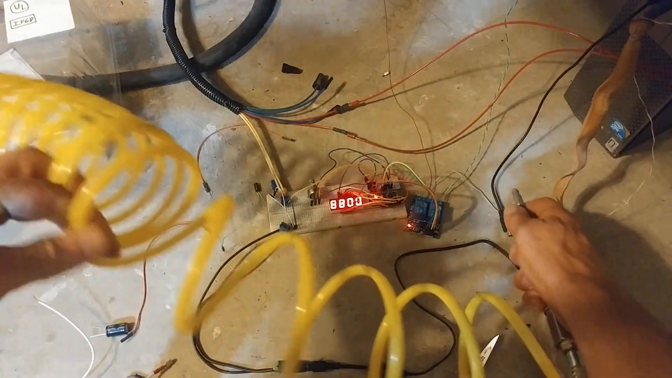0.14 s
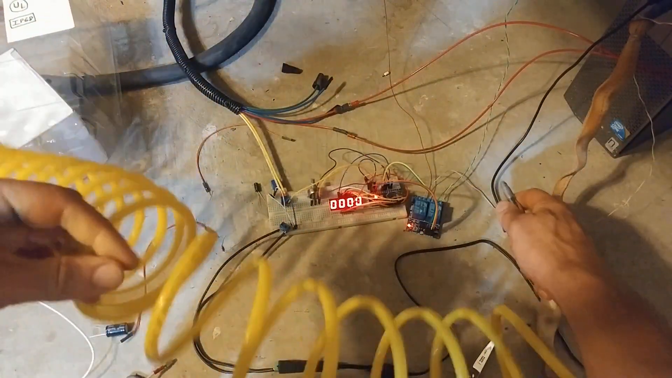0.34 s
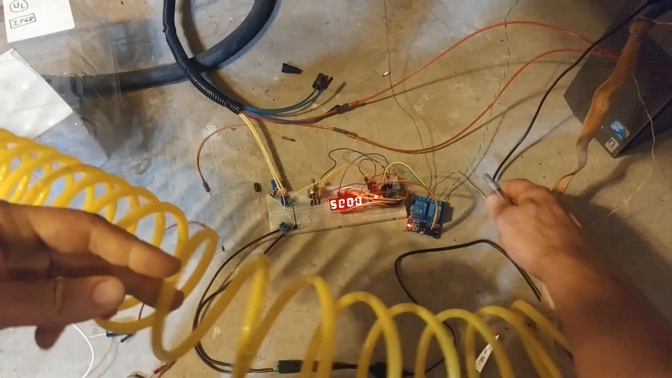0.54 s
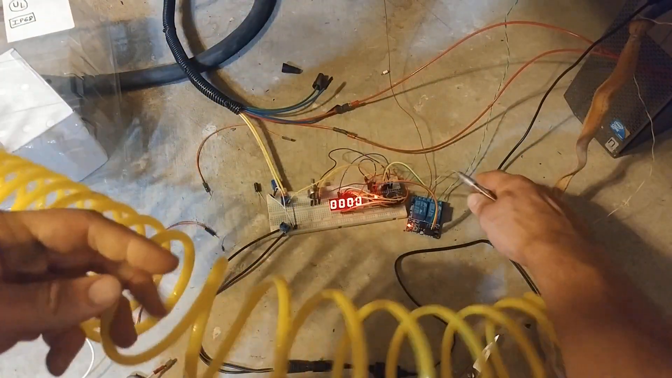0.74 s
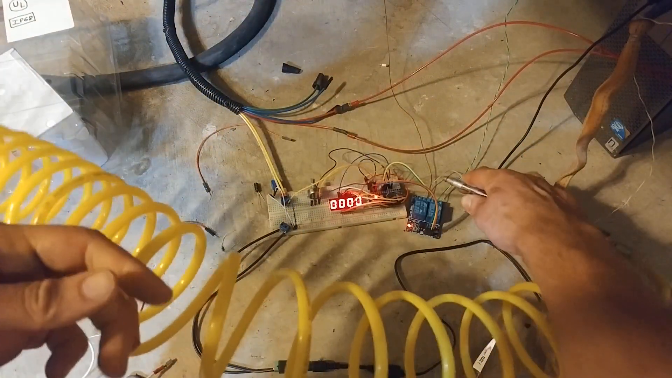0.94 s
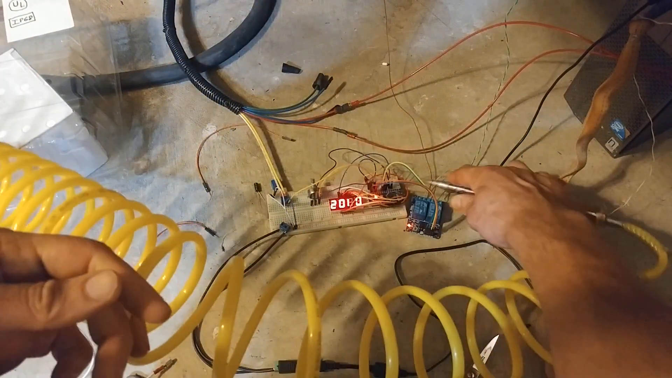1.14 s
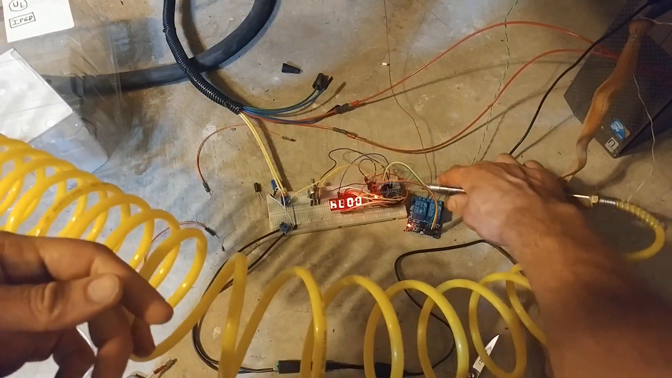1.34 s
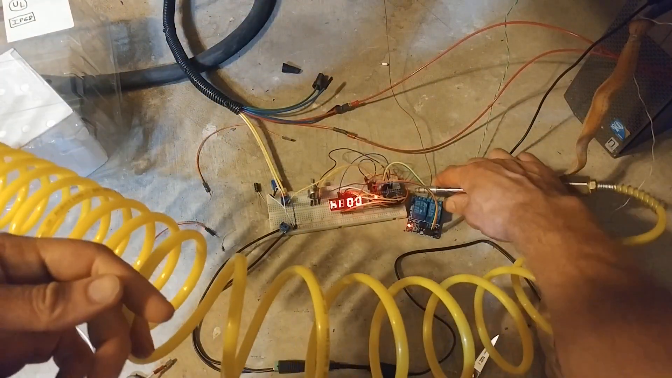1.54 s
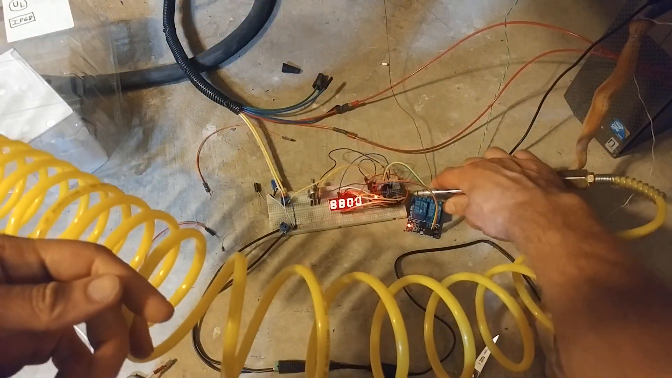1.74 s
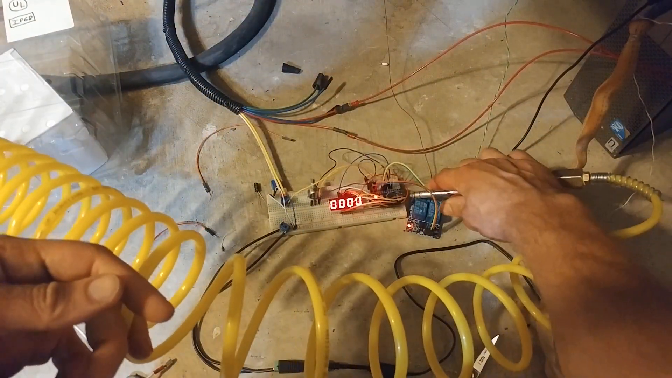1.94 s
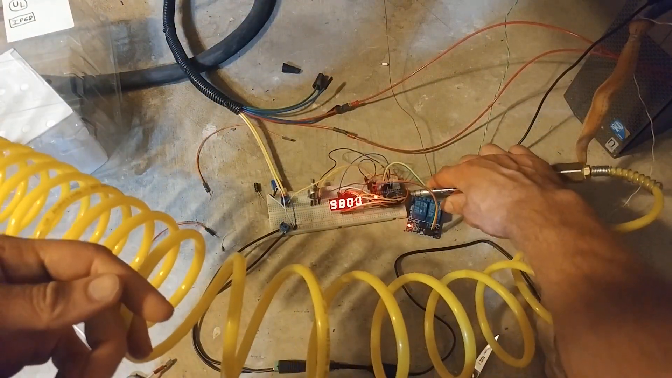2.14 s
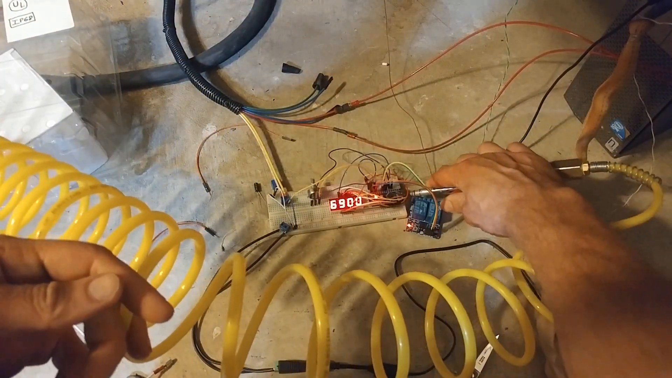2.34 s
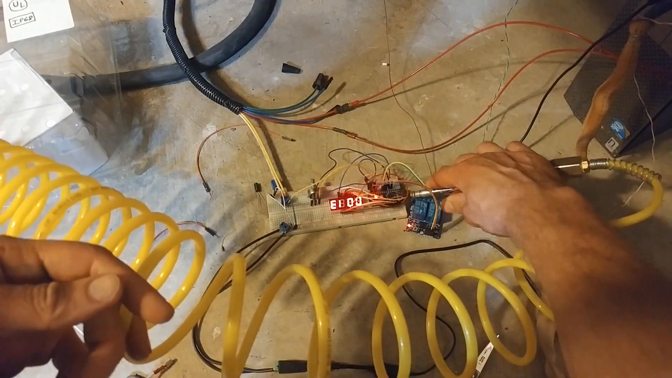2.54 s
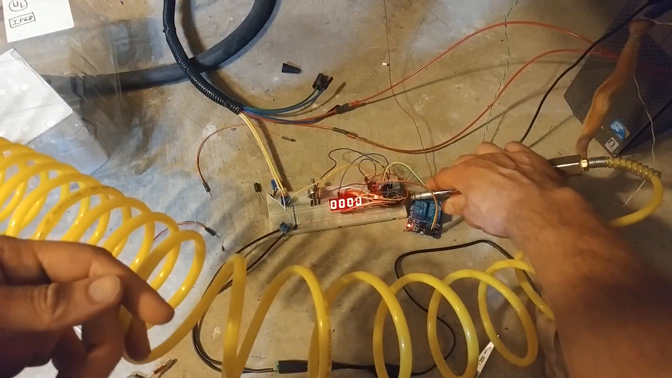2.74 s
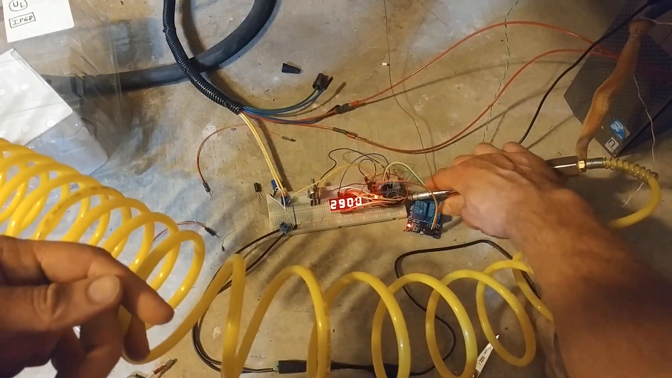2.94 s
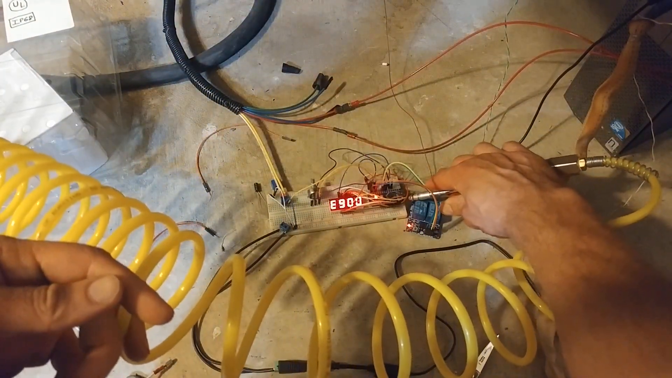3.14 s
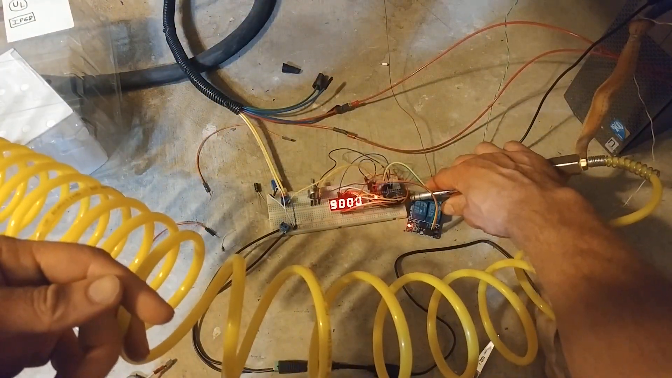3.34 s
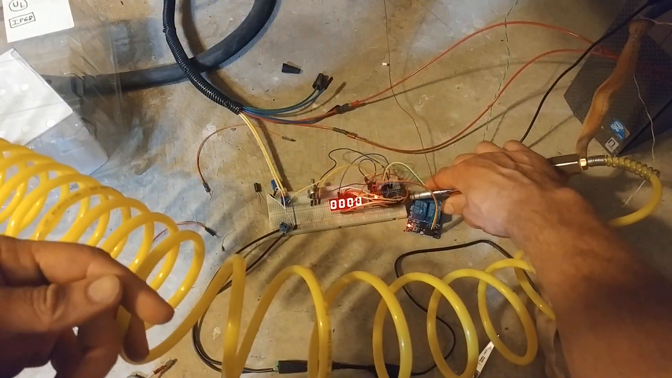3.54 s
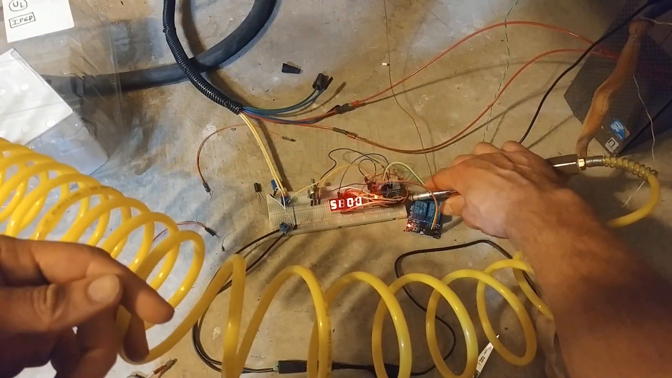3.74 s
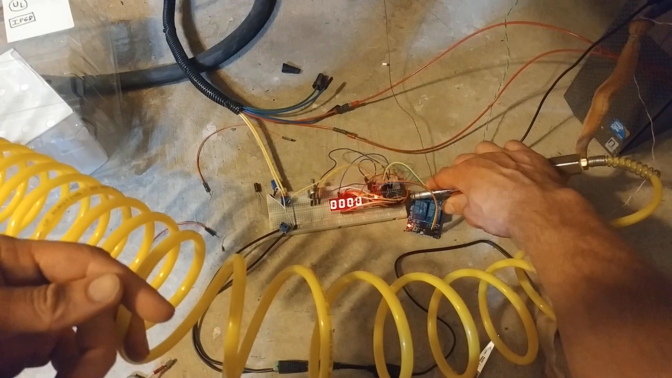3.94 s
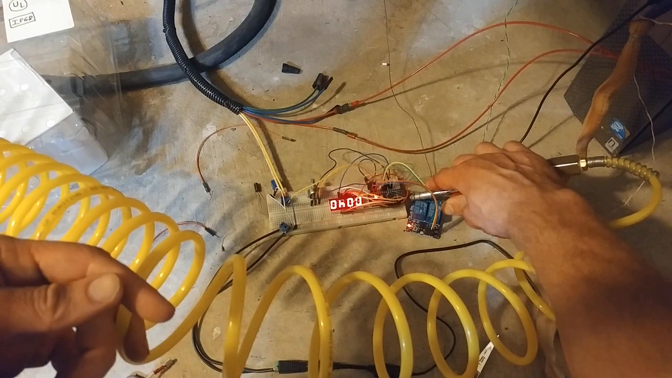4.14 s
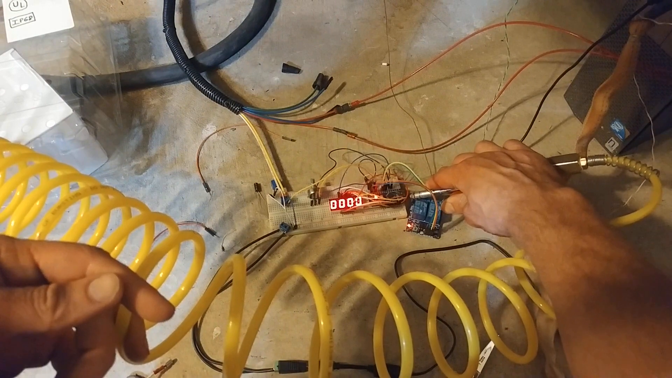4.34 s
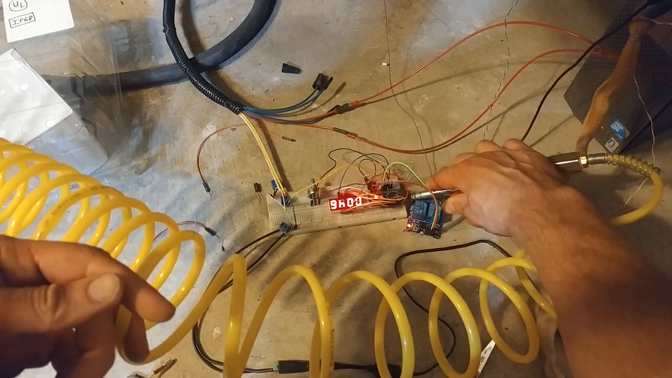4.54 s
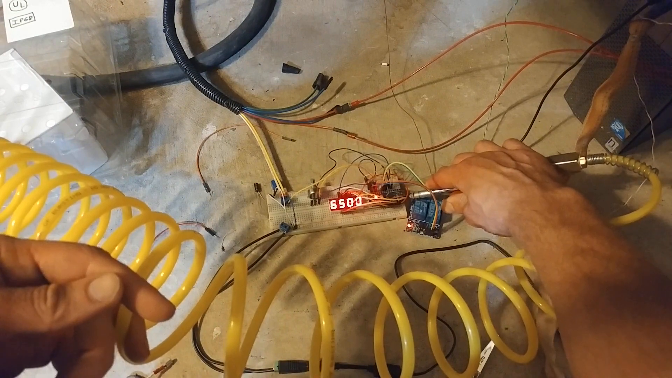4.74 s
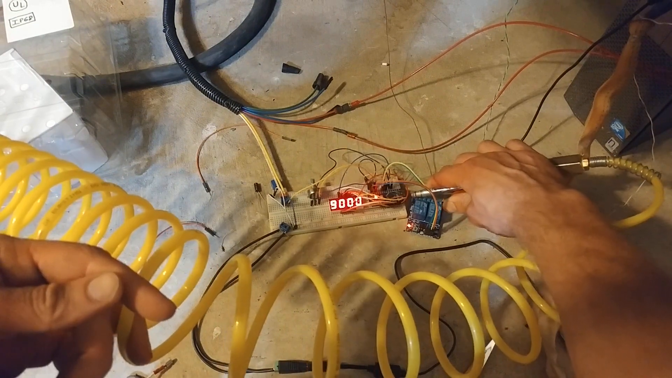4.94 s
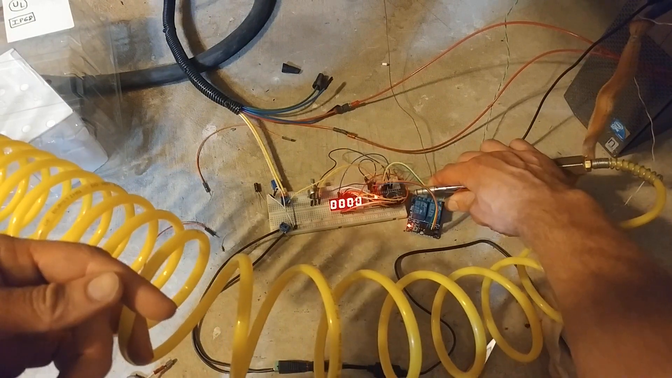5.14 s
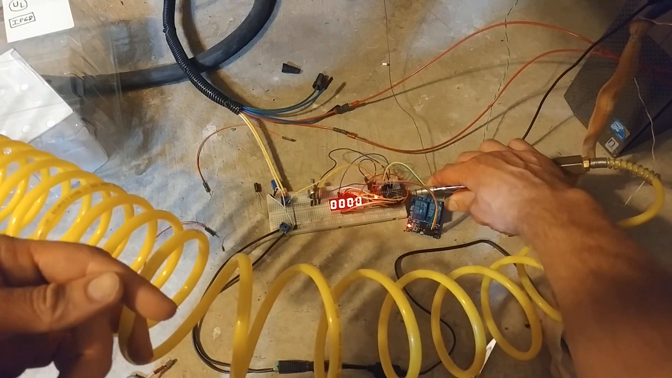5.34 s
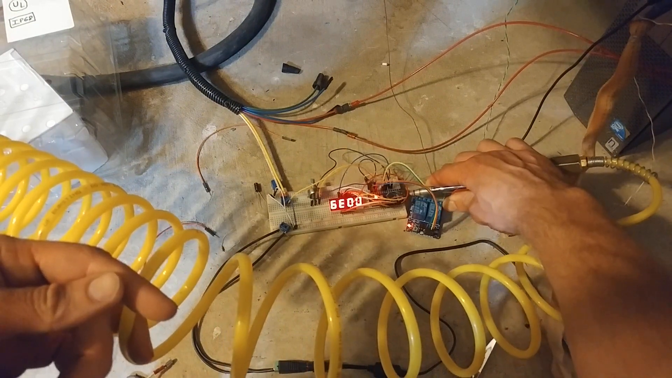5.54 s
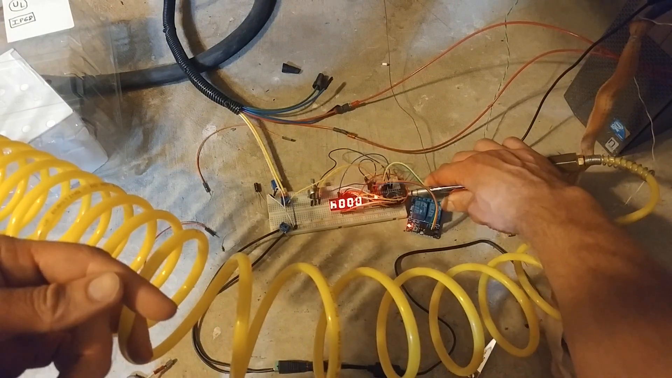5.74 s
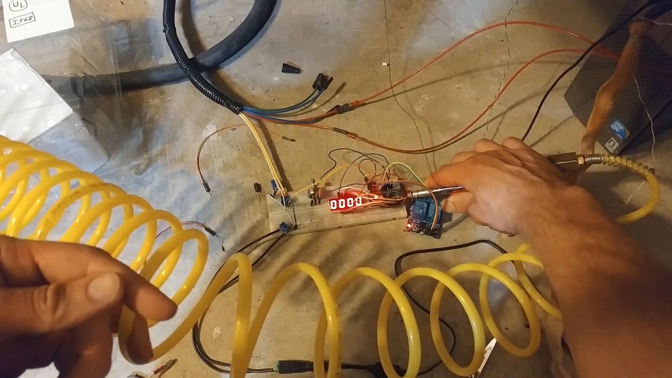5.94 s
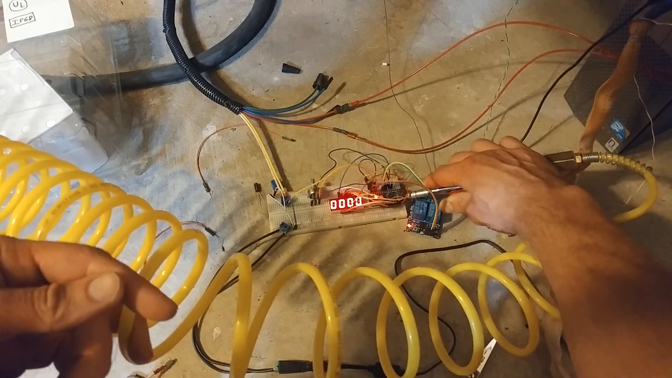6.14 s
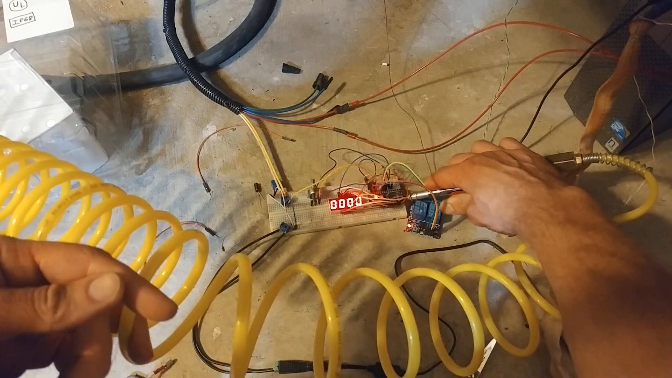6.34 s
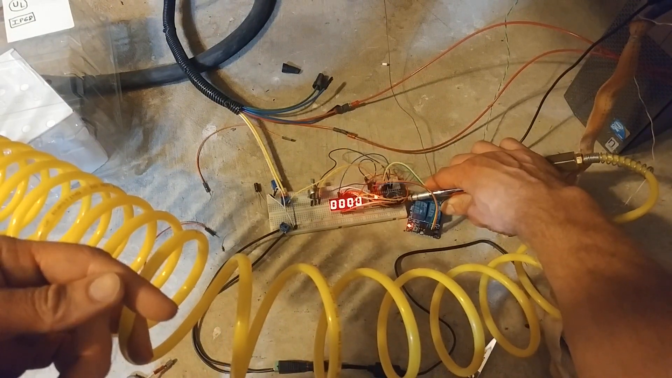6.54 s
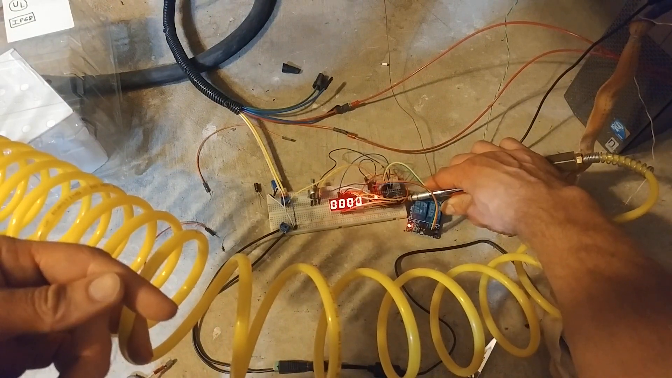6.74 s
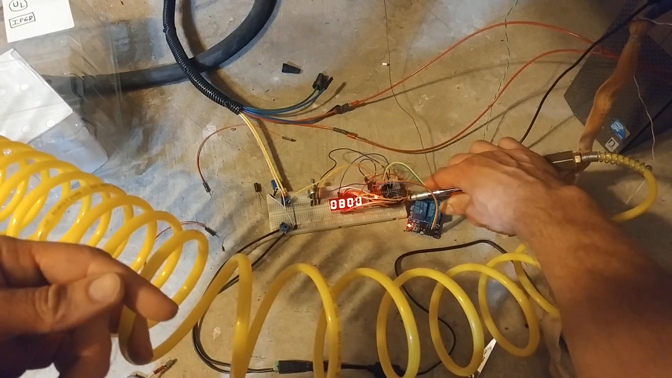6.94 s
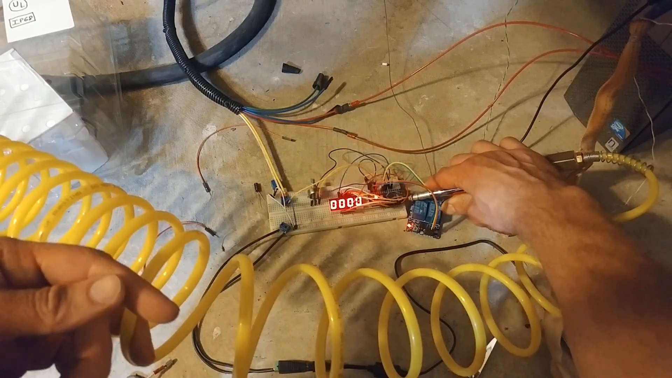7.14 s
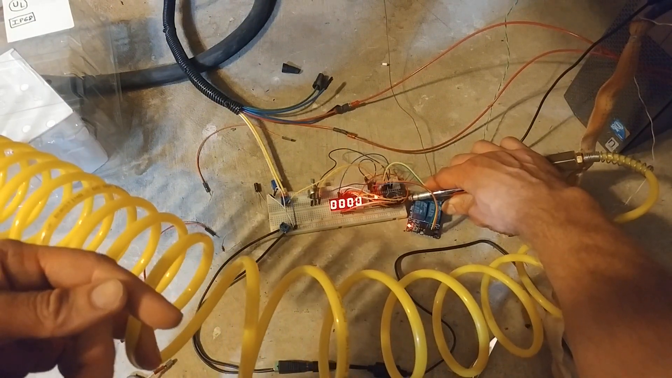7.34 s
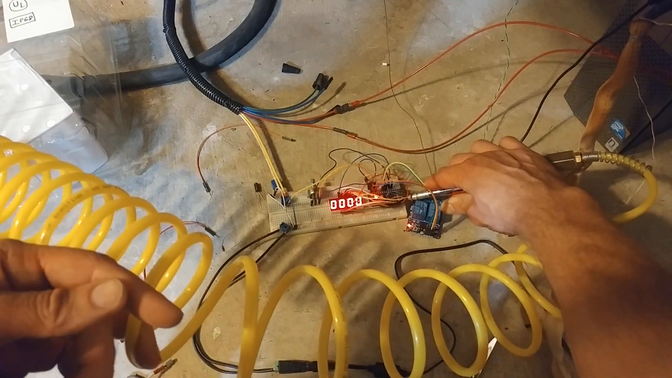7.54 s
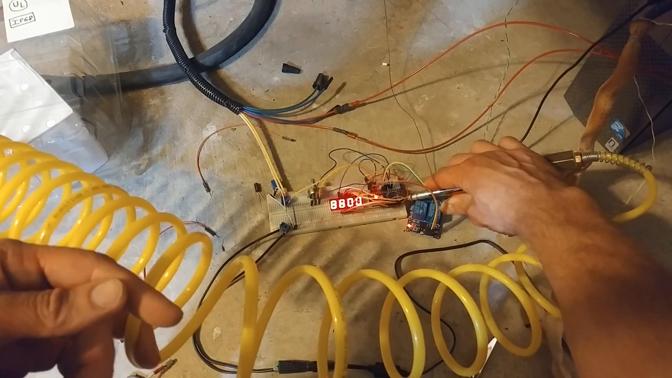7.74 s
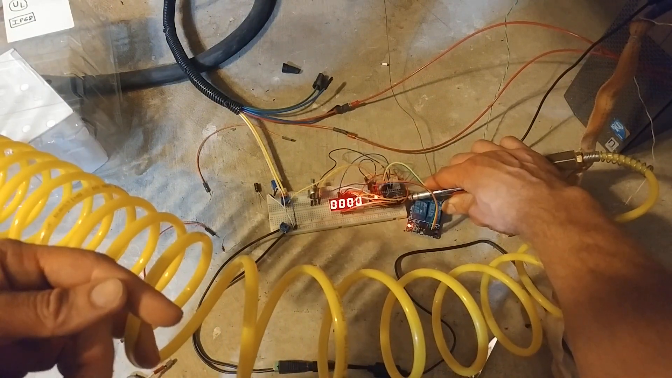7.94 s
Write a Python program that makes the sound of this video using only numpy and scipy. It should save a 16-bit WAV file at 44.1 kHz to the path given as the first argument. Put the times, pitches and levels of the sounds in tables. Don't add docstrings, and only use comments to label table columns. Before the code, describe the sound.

Faint low workshop rumble and a very weak distant motor hum open the scene. At about 0.1 s a small metal valve ticks twice and a burst of free air leaps out, strongest until about 0.25 s, then fading quickly by 0.5 s. Hollow bench knocks and hard plastic raps from the springing coiled hose cluster at 0.13-0.26 s, with another knock near 0.53 s and light coil taps until about 1.3 s over a thin, faintly whistling trickle. From 1.3 s the air swells, reaching full force around 1.6-2 s: a bright, dense hiss splashing on a circuit board, with a breathy edge tone most noticeable near 1.7 s. It dips around 2.3 s, surges at 2.7 s, then holds, gently wavering with brief brushing swells, a sharper one at 6.4 s, and a stronger push near 6.9 s. It is still hissing at 8 s. Close, centred microphone.

```python
import sys
import numpy as np
from scipy import signal
from scipy.fft import rfft, irfft, next_fast_len
from scipy.io import wavfile

SR = 44100
rng = np.random.default_rng(int(sys.argv[2]) if len(sys.argv) > 2 else 0)


def put_to_file(sound):
    columns = np.atleast_2d(sound).T
    safe = np.clip(columns, -1, 1)
    whole_steps = np.round(safe * 32767)
    wavfile.write(sys.argv[1], SR, whole_steps.astype(np.int16))


def rack_gain(trim_db):
    fader = np.asarray(trim_db, float)
    return 10 ** (fader / 20)


N = 356328
SIZE = next_fast_len(N, True)
HZ = np.arange(SIZE // 2 + 1) * SR / SIZE + 1e-3


def rms_one(x):
    return x / np.sqrt(np.mean(x ** 2) + 1e-20)


def in_time(rows):
    s, *columns = np.transpose(rows)
    return [np.interp(np.arange(N) / SR, s, column) for column in columns]


def ramp(start_s, end_s):
    return np.clip((np.arange(N) / SR - start_s) / (end_s - start_s), 0, 1)


def colour(points):
    hz, db = np.transpose(points)
    return rack_gain(np.interp(np.log(HZ), np.log(hz), db))


def drift(rate):
    r = np.exp(-40 * np.pi * rate / SR)
    noise = rng.standard_normal(N // 20 + 4002)
    slow = signal.lfilter([1], [1, -2 * r, r * r], noise)[4000:]
    return np.interp(np.arange(N) / 20, np.arange(len(slow)), rms_one(slow - slow.mean()))


def strike(times, peaks_db, modes, contact_ms):
    out = np.zeros(N)
    spread = rng.standard_normal((len(times), len(modes)))
    for (hz, db, t60), chance in zip(modes, spread.T):
        clicks = np.full(N, 1e-18)
        clicks[(np.array(times) * SR).astype(int)] = rack_gain(np.array(peaks_db) + db + 1.5 * chance)
        r = rack_gain(-60 / (t60 * SR))
        w = 2 * np.pi * hz / SR
        swell = np.hanning(round(contact_ms * SR / 1000) + 3)
        push = swell / swell.sum() * 2 * np.cos(w * np.arange(len(swell)))
        pushes = np.convolve(clicks, push)[:N]
        out += signal.lfilter([0, np.sin(w)], [1, -2 * r * np.cos(w), r * r], pushes)
    return out


# start_s, level_db
ROOM = [(0, -63.5), (.1, -62.5), (.2, -61), (1.2, -60), (3, -61), (5, -62.5), (8.08, -64.5)]
# pitch_hz, density_db (dB per Hz)
ROOM_COLOUR = [(12, -41), (20, -6), (81, -5.0), (201, -9.5), (255, -7), (303, -5.5), (349, 0.5),
               (397, -9.5), (445, -3.5), (492, -9.0), (600, -9.5), (780, -39), (1320, -120)][:-1]
# pitch_hz, density_db (dB per Hz)
ROOM_TOP = [(800, -14.5), (1500, -19), (3200, -23.5), (5000, -18), (6500, -11.5), (8000, -19), (10000, -29),
            (16000, -42)]
# pitch_hz, level_db (rms)
HUM = [(259.5, -73), (872, -84)]


def workshop():
    room = colour(ROOM_COLOUR[:-1] + ROOM_TOP)
    rumble = rms_one(irfft(rfft(rng.standard_normal(SIZE)) * room, SIZE)[:N])
    turning = np.cumsum(1 + 0.00385 * drift(5.0)) / SR
    lines = np.zeros(N)
    for hz, db in HUM:
        lines += rack_gain(db + 4 + 0.3 * drift(3.1)) * np.sin(2 * np.pi * hz * turning)
    level_db = in_time(ROOM)[0]
    return rack_gain(level_db) * rumble + rack_gain(0.83 * (level_db - level_db.mean())) * lines


# start_s, body_db (hollow peak), rap_db (hard peak)
KNOCKS = [(.127, -32, -43), (.147, -34, -48), (.168, -37, -52), (.178, -36, -53), (.197, -42, -58),
          (.212, -43, -58), (.222, -43, -60), (.24, -48, -62), (.262, -45, -60), (.43, -49, -56),
          (.529, -38, -45), (.548, -50, -54), (.575, -52, -57), (.605, -51, -62)]
# pitch_hz, level_db, t60_s
BODY = [(140, -24, .05), (300, -9, .035), (352, 0, .04), (410, -10, .03)]
# pitch_hz, level_db, t60_s
RAP = [(800, -5, .03), (1090, -7, .05), (1265, 0, .035), (1550, -4, .025), (1950, -11, .02),
       (2300, -11, .02), (3100, -15, .012), (3900, -18, .01)]
# start_s, peak_db
TAPS = [(.255, -50), (.36, -53), (.43, -54), (.641, -49.5), (.75, -54), (.966, -51), (1.172, -56),
        (1.288, -55)]
# pitch_hz, level_db, t60_s
COIL = [(560, -5, .025), (800, 0, .03), (1020, -2, .025), (1450, -12, .02)]
# pitch_hz, level_db, t60_s
THUMP = [(136.5, -59, 0.19), (203, -51, 0.095)]


def hose():
    s, body_db, rap_db = np.transpose(KNOCKS)
    dry = strike(s, body_db, BODY, contact_ms=8)
    dry = dry + strike(s, rap_db, RAP, contact_ms=2)
    dry = dry + strike(*np.transpose(TAPS), COIL, contact_ms=2.5)
    dry = dry + strike(s[:3], [0, -3, -5], THUMP, contact_ms=12)
    lag = np.arange(SR // 2) / SR
    walls = rng.standard_normal(len(lag)) * rack_gain(-60 * lag / .3) * np.clip(lag / .02, 0, 1)
    return dry + rack_gain(-37) * signal.fftconvolve(dry, walls)[:N]


# start_s, peak_db
VALVE_TICKS = [
    (.0945, -35),
    (.1035, -36),
]
# pitch_hz, level_db, t60_s
VALVE = [(3435, -21, .07), (5600, -14, .01), (6400, 0, .014), (7060, -7, .012), (9700, -15, .04)]


def valve():
    return strike(*np.transpose(VALVE_TICKS), VALVE, contact_ms=4.2)


ZONE_HZ = [700, 2750, 6000, 9700, 12200, 15700]


def zones(gain):
    noise = rfft(rng.standard_normal(SIZE)) * gain
    steps = [1 / (1 + (hz / HZ) ** 20) for hz in ZONE_HZ[1:5]]
    above = [1 / (1 + (500 / HZ) ** 4)] + steps + [0]
    out = []
    for k in range(5):
        inside = (HZ > ZONE_HZ[k]) & (HZ < ZONE_HZ[k + 1])
        level = np.sqrt(2 * np.sum(np.abs(noise[inside]) ** 2)) / SIZE
        out.append(irfft(noise * (above[k] - above[k + 1]), SIZE)[:N] / level)
    return out


# delay_ms, gain (plain factor)
ECHOES = [(0.432, 0.033), (0.802, 0.0045), (0.932, 0.08), (1.13, -0.035), (1.26, 0.044), (1.498, -0.021),
          (2.431, 0.039), (4.9, -0.032)]


def near_echoes():
    lag = np.arange(1600)
    path = .026 * rng.standard_normal(1600) * (lag > 130) * np.exp(-lag / 500)
    path[0] = 1
    for ms, gain in ECHOES:
        path[round(ms * SR / 1000)] += gain
    return np.abs(rfft(path, SIZE))


def rings(cavities, lift_db):
    return rack_gain(lift_db * sum(1 / (1 + (2 * (HZ - hz) / width) ** 2) for hz, width, _ in cavities))


# start_s, pitch_hz, level_db (against the hiss)
EDGE = [(0.95, 6960, -3.5), (1.7, 6750, 1.5), (3.79, 7024, -12), (4.72, 6850, -10), (4.98, 7070, -8),
        (5.24, 6840, -4), (5.66, 6960, -6.5), (8.08, 7090, -15)]


def edge_tone(width_hz):
    hz, db = in_time(EDGE)
    low_pass = signal.butter(2, width_hz, fs=SR, output="sos")
    slow = signal.sosfilt(low_pass, rng.standard_normal((2, N)))
    phase = 2 * np.pi * np.cumsum(hz) / SR
    return rack_gain(db) * rms_one(slow[0] * np.cos(phase) + slow[1] * np.sin(phase))


# start_s, level_db
FLOW = [(.3, -51.5), (.8, -49.5), (1.0, -48), (1.33, -40.5), (1.57, -34), (2.0, -32), (2.25, -36),
        (2.48, -36), (2.72, -32), (3.17, -36), (3.96, -35.5), (4.09, -34.5), (4.73, -34), (5.33, -36),
        (6.32, -37.5), (6.91, -31), (7.34, -35.5), (8.08, -36.5)]
# start_s, treble_db
FACING = [(.1, -1), (.7, -3), (1.22, -13), (1.57, -17), (1.69, -6.2), (2.5, 4.5), (2.7, 0.5), (3.2, -3),
          (3.9, 0.8), (4.45, 1.5), (5.12, 1), (5.7, 3), (5.83, 0), (6.4, -4), (6.75, -2), (7.15, 1),
          (7.7, -3.5), (8.08, -4)]
# start_s, hiss_db, splash_db (lifts), half_length_s
BRUSHES = [(1.434, 1.5, 7, .07), (1.545, -1.2, -3.5, .04), (1.644, -0.5, 7.5, 0.16), (1.834, 0, 5, 0.076),
           (2.854, 1, 3.5, 0.13), (3.222, 2, 4, 0.073), (3.41, 2, 2.5, 0.26), (4.197, 0.8, 2.5, .12),
           (4.46, 1, 0, .06), (4.673, 1.3, 3, 0.16), (5.01, 2.5, 2, .06), (5.133, 4, 2.2, 0.087),
           (5.237, 0.8, 4.5, 0.078), (5.96, 1.7, -0.5, 0.091), (6.409, 6, 9.5, .07), (6.75, 0.3, 2, 0.13),
           (6.978, -3.5, -4, 0.047), (7.098, 0, 2.5, .08), (7.393, 1.5, 2, 0.088), (7.57, 1.9, 3, 0.18),
           (7.812, 3, 5.5, 0.053), (8.08, .6, 3, 0.021)]
# start_s, end_s, lift_db
SPILLS = [(1.28, 1.8, 8), (2.29, 2.598, 1.5), (5.228, 5.426, 3), (5.43, 5.784, 2), (5.772, 6.462, 5)]
# rush_db, splash_db, shoulder_db, spray_db
BALANCE_DB = [
    (-21, -8.5, -13.5, -30),
    (-26.5, -7, -16, -28),
    (-22, -4.5, -14.5, -25),
    (-24, -5.5, -18.5, -28.5),
    (-23.5, -7, -17.5, -28.5),
]


def jet_levels(shares):
    t = np.arange(N) / SR
    burst_db = -33.7 - 110 * np.maximum(0.13 - t, 0) - 46 * np.maximum(t - 0.23, 0)
    flow_db = 10 * np.log10(rack_gain(burst_db) ** 2 + rack_gain(in_time(FLOW)[0]) ** 2)
    hiss_lift, splash_lift = np.zeros(N), np.zeros(N)
    for s, hiss_db, splash_db, half in BRUSHES:
        touch = np.clip(1 - np.abs(t - s) / half, 0, 1)
        hiss_lift += hiss_db * touch
        splash_lift += splash_db * touch
    edge_s = 0.053
    spill = np.zeros(N)
    for a, b, db in SPILLS:
        spill += db * (ramp(a - edge_s, a + edge_s) - ramp(b - edge_s, b + edge_s))
    flow_share, facing_share = (-0.65, 0.085, 0.082, -0.035), (0.072, 0.19, 0.71, 0.64)
    extra_flow_db = (flow_db + 35) * shares[2:].sum(axis=0)
    levels = flow_db + np.transpose(BALANCE_DB) @ shares
    levels = levels + np.outer(facing_share, in_time(FACING)[0]) + np.outer(flow_share, extra_flow_db)
    rush, splash, shoulder, spray = levels
    treble_lift = .7 * hiss_lift + 0.27 * splash_lift
    rush = rush + spill + 0.21 * splash_lift
    return rush, splash + splash_lift, flow_db + hiss_lift, shoulder + treble_lift, spray + treble_lift


# start_s, end_s
HANDOVERS = [
    (.4, 0.82),
    (1.25, 1.65),
    (2.55, 2.9),
    (5.1, 5.4),
]
# pitch_hz, density_db (dB per Hz)
FREE = [(350, -47), (600, -17), (981, -24), (1310, -17), (1670, -20), (2320, -18), (3130, -16.5),
        (5640, -1.5), (7210, -5.5), (8380, -6), (11900, -35), (15700, -27)]
TRICKLE = [(350, -10), (600, -11), (660, -18.5), (778, -16), (942, -14), (1020, -29), (1060, -10),
           (2730, -22), (3010, -16.5), (3790, -16), (4350, -7), (7410, -4.5), (10000, -12.5), (12600, -33),
           (15700, -32)]
CLOSE = [(470, -33), (800, -33.5), (1510, -22), (1990, -31), (2280, -25.5), (2640, -25), (2920, -10),
         (4350, 2.5), (5940, -4), (6730, -0.5), (8960, -4.5), (9780, -21), (11500, -26), (12900, -36),
         (15700, -27)]
BOARD = [(470, -65), (800, -35), (1180, -22.5), (1590, -21), (1990, -27.5), (2640, -19.5), (3150, -8),
         (4300, 1.5), (5450, -4), (7160, -3.5), (8420, -5), (9900, -14.5), (11100, -10.5), (12700, -28.5),
         (15700, -27)]
TURNED = [(350, -54), (600, -29.5), (995, -28.5), (1200, -20.5), (1520, -20.5), (1860, -27), (2590, -22),
          (2930, -10.5), (4290, -2.5), (5950, -8), (7210, -4), (8490, -7), (11300, -28), (12800, -48),
          (15700, -45)]
# pitch_hz, width_hz, level_db
TRICKLE_RINGS = [(3550, 270, -18), (4980, 100, -8), (5370, 79, -9), (5810, 72, -6), (6710, 100, 0),
                 (7220, 140, -2), (8820, 54, -9)]
# pitch_hz, width_hz, level_db
CAVITIES = [(4450, 78, 0), (4820, 74, 0), (5160, 32, -4), (5710, 110, -3), (6930, 240, 0), (7960, 87, 0),
            (8120, 120, -1), (10400, 190, -12), (10700, 84, -12)]
TURNED_CAVITIES = [(4190, 320, 0), (4640, 46, 0), (4990, 39, -2), (5710, 91, -2), (6480, 57, -3),
                   (7210, 260, 0), (7960, 84, 0), (9390, 140, -6), (10400, 52, -13), (10900, 100, -14)]


def jet(buffet_db, own_db, flutter_db):
    fades = [ramp(a, b) for a, b in HANDOVERS]
    shares = -np.diff([np.ones(N)] + fades + [np.zeros(N)], axis=0)
    colours = [colour(FREE),
               colour(TRICKLE) * rings(TRICKLE_RINGS, lift_db=0.5),
               colour(CLOSE) * rings(CAVITIES, lift_db=3.0),
               colour(BOARD) * rings(CAVITIES, lift_db=3.5),
               colour(TURNED) * rings(TURNED_CAVITIES, lift_db=2.0)]
    parts = np.zeros((5, N))
    for gain, share in zip(colours, shares):
        parts += np.sqrt(share) * np.array(zones(gain * near_echoes()))
    near = np.clip((np.arange(N) / SR - EDGE[0][0]) / 0.22, 0, 1)
    edge_db = in_time(EDGE)[1]
    parts[2] = (parts[2] + near * edge_tone(width_hz=340)) / np.sqrt(1 + (near * rack_gain(edge_db)) ** 2)
    struck = shares[2:].sum(axis=0)
    buffet = buffet_db * drift(6.5) + flutter_db * drift(130)
    out = np.zeros(N)
    for db, part in zip(jet_levels(shares), parts):
        out += rack_gain(db + struck * (buffet + own_db * drift(21))) * part
    return out * np.clip((np.arange(N) / SR - VALVE_TICKS[0][0]) / 0.038, 0, 1)


def scene():
    mono = workshop() + hose() + valve() + jet(buffet_db=0.38, own_db=0.2, flutter_db=0.31)
    return np.array([mono, mono])


def top_cut(x):
    return signal.sosfilt(signal.butter(12, 16010, fs=SR, output="sos"), x)


# start_s, low_hz, high_hz, level_db
SPLITS = [(1.36, 7500, 11500, -58), (1.7, 7500, 9200, -41), (1.7, 10300, 11800, -52),
          (2.18, 13800, 15200, -64), (2.3, 10300, 12500, -56), (4.25, 5000, 7600, -42),
          (4.7, 13000, 15000, -68), (4.79, 9600, 11000, -55), (4.88, 8900, 10400, -53),
          (5.83, 13000, 15000, -72), (6.02, 4200, 6400, -46), (6.11, 13000, 15700, -73),
          (6.3, 5600, 7000, -48), (7.27, 6200, 7600, -42), (7.5, 13000, 15000, -73)]


def record(dry):
    side = np.zeros(N)
    swell = np.sin(np.pi * np.arange(2048) / 2048)
    for s, low_hz, high_hz, db in SPLITS:
        band = signal.butter(6, [low_hz, high_hz], "band", fs=SR, output="sos")
        start = round((s * SR - 1122) / 1024) * 1024 + 98
        noise = rms_one(signal.sosfilt(band, rng.standard_normal(2048)))
        side[start:start + 2048] += rack_gain(db) * swell * noise
    stereo = dry + side * [[1], [-1]]
    mix = irfft(rfft(stereo, SIZE) * (HZ < 15720), SIZE)[:, :N]
    return top_cut(mix)


dry = scene()
out = record(dry)
put_to_file(out)
```